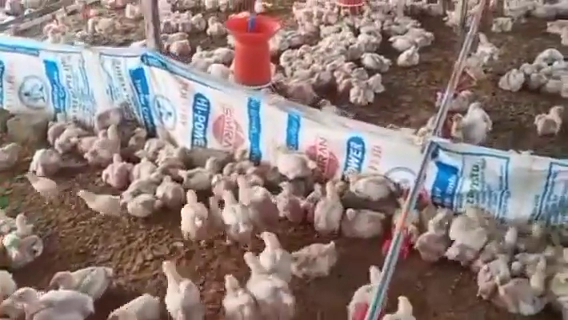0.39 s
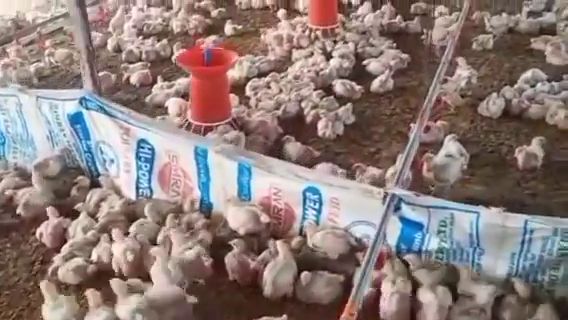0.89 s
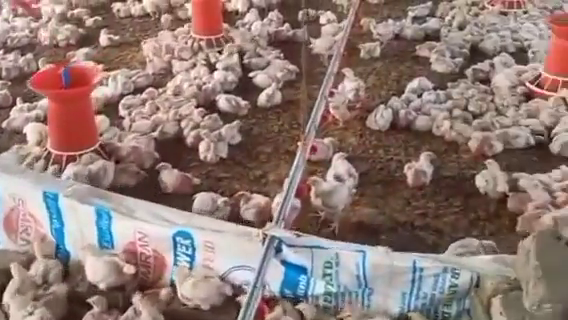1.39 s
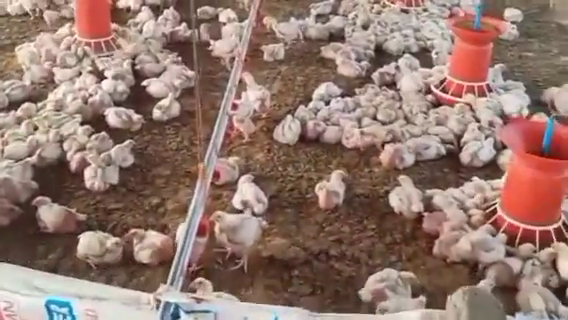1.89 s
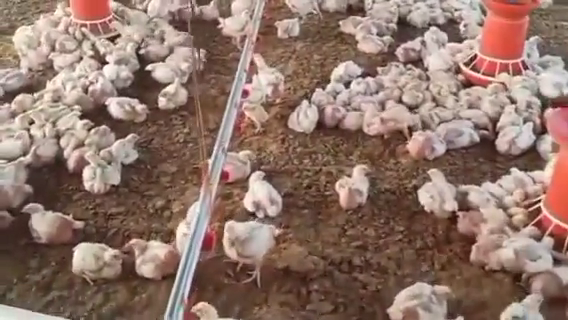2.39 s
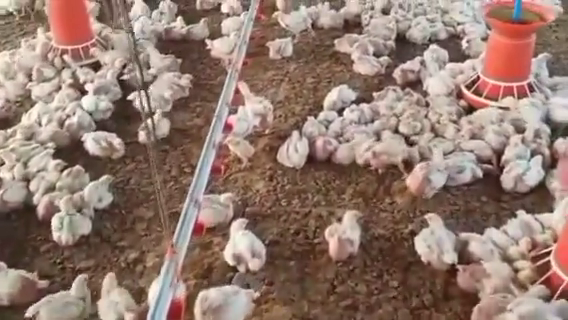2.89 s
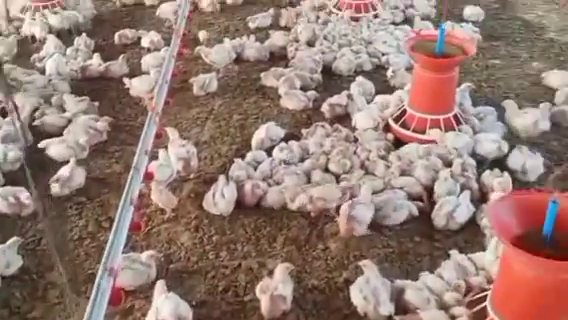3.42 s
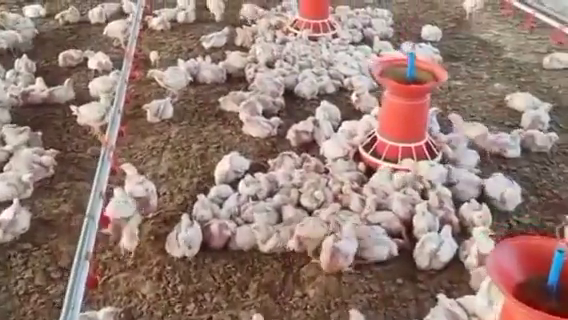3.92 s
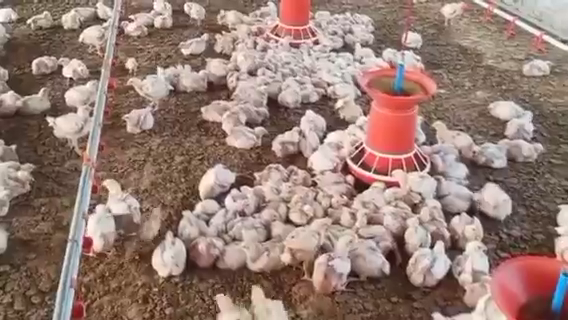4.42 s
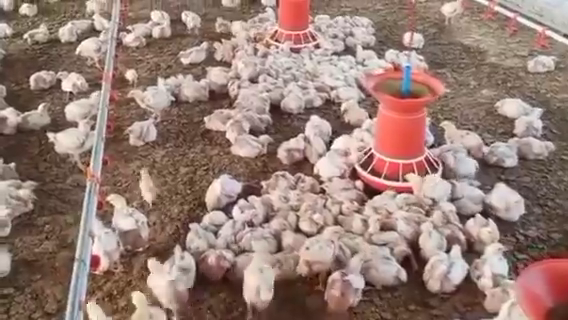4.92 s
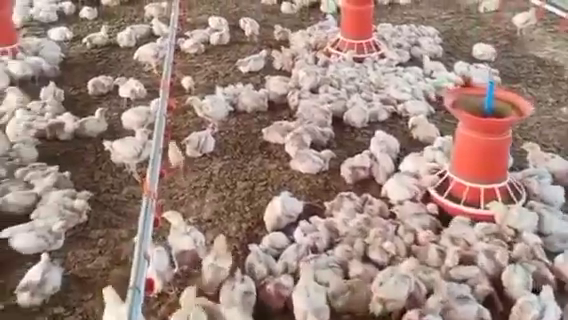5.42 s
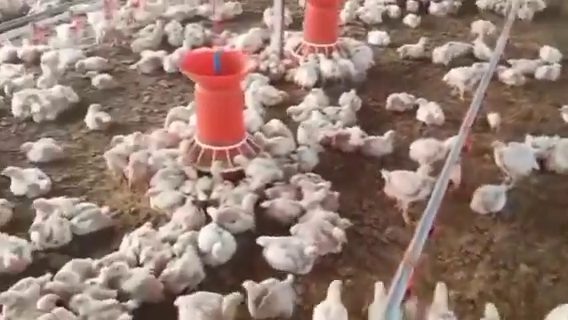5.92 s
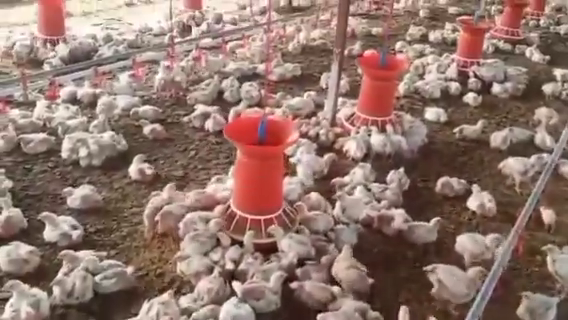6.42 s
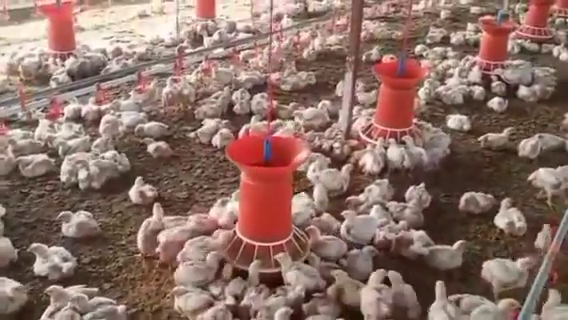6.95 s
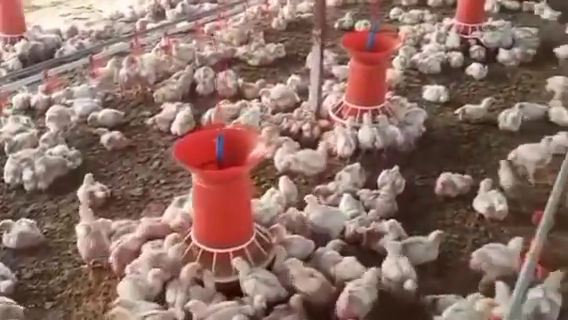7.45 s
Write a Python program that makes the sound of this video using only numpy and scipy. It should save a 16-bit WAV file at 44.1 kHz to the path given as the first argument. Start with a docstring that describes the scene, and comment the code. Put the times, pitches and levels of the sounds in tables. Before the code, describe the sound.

A large flock of young chickens peeps in a dense, constant chorus inside a shed, with rough chirrups, rustling litter and occasional dull knocks.

```python
"""A large flock of chicks peeps in a shed: a dense far chorus goes on throughout, each peep a gliding whistle.
It opens with a low held call and falling peeps; rough chirrups soon join, and both go on to the end.
Dry litter rustles and flicks as filtered noise; dull knocks ring now and then, over a hum with wind lumps.
Late on, one chick close by gives a long throbbing cry, and soon after comes the loudest knock.
Two microphone ports a hand apart hear it all; the right one is duller."""
import sys
import numpy as np
from scipy import signal
from scipy.fft import rfft, irfft, next_fast_len
from scipy.io import wavfile
from scipy.ndimage import uniform_filter1d, minimum_filter1d

SR = 44100
rng = np.random.default_rng(int(sys.argv[2]) if len(sys.argv) > 2 else 0)


def natural_amplitude(level_db):
    """Convert a level in decibels to a linear amplitude factor, elementwise."""
    exponent = np.asarray(level_db, float) / 20
    return 10 ** exponent


def pcm_store(signal):
    """Save signal as 16-bit PCM."""
    levels = np.round(np.clip(np.atleast_2d(signal), -1, 1) * 32767)
    wavfile.write(sys.argv[1], SR, levels.astype(np.int16).T)


N = 333837  # length in samples


def rms_one(x):
    """Scale a sound to an average strength (rms) of 1."""
    return x / np.sqrt(np.mean(x ** 2) + 1e-20)


def in_time(rows):
    """Join the rows of a table by straight lines, one curve for each column after the time."""
    s, *columns = np.transpose(rows)
    return [np.interp(np.arange(N) / SR, s, column) for column in columns]


def colour(x, points):
    """Filter by a table of (Hz, dB), joined by lines on a logarithmic pitch scale."""
    size = next_fast_len(N)
    hz = np.maximum(np.arange(size // 2 + 1) * SR / size, 1)
    points = np.array(points)
    gain_db = np.interp(np.log(hz), np.log(points[:, 0]), points[:, 1])
    return irfft(rfft(x, size) * natural_amplitude(gain_db), size)[..., :N]


def drift(rate):
    """Random wandering of rms 1: noise points at the given rate per second, joined by lines."""
    points = rng.standard_normal(N // 20)
    return rms_one(np.interp(np.arange(N) * rate / SR, np.arange(N // 20), points))


def add(out, s, tone, side):
    """Place a sound; its direction (1 left, -1 right) sets which port hears it first and louder."""
    port_lag_s = 0.00041
    for port, sign in enumerate([1, -1]):
        at = max(round((s - sign * side * port_lag_s / 2) * SR), 0)
        out[port, at:at + len(tone)] += tone[:max(N - at, 0)] * natural_amplitude(5.7 * sign * side)


def whistle(hz, height, overtone_db=-25, third_db=-50):
    """A nearly pure tone with two weak overtones, following a pitch curve and a height curve."""
    phase = 2 * np.pi * np.cumsum(hz) / SR
    overtones = natural_amplitude(overtone_db) * np.sin(2 * phase) + natural_amplitude(third_db) * np.sin(3 * phase)
    return height * (np.sin(phase) + overtones)


def peeps(rows, sides, rough, waver, onset, overtone_db):
    """Each peep glides along a parabola through its three pitches, starts fast and fades; the throat flutters."""
    swell_s = 0.004  # no peep starts faster than this
    out, flutter, wobble = np.zeros((2, N)), drift(240), drift(150)
    for (s, length, start, middle, end, level_db), side, pick in zip(rows, sides, rng.random(len(rows))):
        count = max(round(length * SR), 100)
        u = np.arange(count) / count  # runs from 0 to 1 through the peep
        # each peep takes its shaking from a random place
        first = int(pick * (N - count))
        shake = slice(first, first + count)
        hz = start * (1 - u) * (1 - 2 * u) + 4 * middle * u * (1 - u) + end * u * (2 * u - 1)
        hz = hz * (1 + waver * wobble[shake])
        height = natural_amplitude(level_db) * np.sin(np.pi * u ** onset) ** 0.48
        height *= rms_one(1 + rough * flutter[shake])
        height *= np.sin(np.pi / 2 * np.minimum(u * length / swell_s, 1)) ** 2
        add(out, s, whistle(hz, height, overtone_db), side)
    return out


def shed(x, wet_db):
    """Walls and roof answer with a dying wash, different at each port."""
    t60_s = 0.21  # time for the wash to sink by 60 dB
    t = np.arange(SR // 2) / SR
    wash = rng.standard_normal((2, len(t))) * natural_amplitude(-60 * t / t60_s) * (t > 0.004)
    wash /= np.sqrt(np.sum(wash ** 2, axis=1, keepdims=True))
    return x + natural_amplitude(wet_db) * signal.fftconvolve(x, wash, axes=1)[:, :N]


def patches(x, edges_hz, slow_db, fast_db):
    """Each band between the edges swells and sinks on its own."""
    size = next_fast_len(N)
    tones = rfft(x, size)
    band = np.searchsorted(edges_hz, np.arange(size // 2 + 1) * SR / size)
    out = 0
    for k in range(len(edges_hz) + 1):
        part = irfft(tones * (band == k), size)[:, :N]
        out = out + part * natural_amplitude(slow_db * drift(11) + fast_db * drift(40))
    return out


def chorus():
    """Hundreds of peeps a second from all sides and distances, most of them falling."""
    # How the far flock swells. Each row: time in seconds, level in dB,
    # stir in dB that brings out the lowest and highest voices most.
    flock_level = [(0.0, -26.5, -5.5), (0.9, -27.5, 2), (1.3, -23.5, -13.5), (2.0, -29, 0),
                   (2.68, -28.5, -10), (3.12, -26.5, -0.5), (3.56, -29, 0.5), (4.47, -26, -3),
                   (5.0, -32.5, 7.5), (5.37, -30, -0.5), (5.88, -28.5, 16.5), (6.4, -28, 10),
                   (6.85, -32.5, 17.5), (7.57, -23.5, 12)]
    # Groups of voices. Each row: lowest and highest middle pitch in Hz, peeps per second,
    # usual fall in octaves, level in dB against the chorus, share of the stir.
    voice_groups = [(1396.6, 1950, 80, 0.2076, -12.5, 0.67), (1950, 3000, 170, 0.3594, -1.04, 0.17),
                    (3000, 3900, 44, 0.35, -15.5, 0.33)]
    out, (level_db, stir_db) = 0, in_time(flock_level)
    for low, high, per_s, fall, voice_db, follows in voice_groups:
        # chance decides, every 20 samples, whether a peep starts
        s = np.flatnonzero(rng.random(N // 20) < per_s * 20 / SR) * 20 / SR
        traits = rng.random((N // 20, 6))[(s * SR / 20).round().astype(int)]
        pitch, length, glide, arch, far, side = traits.T
        middle = low * (high / low) ** pitch
        drop = 2 ** (fall * (glide * 1.4 - 0.2))  # pitch ratio of half the glide
        start = middle * drop / (1 + 0.062 * arch)
        distance_db = -5.0 * np.log(far + 0.12)
        rows = np.transpose([s, 0.02 + 0.045 * length ** 2, start, middle, middle / drop, distance_db])
        voices = peeps(rows, 2 * side - 1, rough=0.6, waver=0.02, onset=0.65, overtone_db=-30)
        voices = shed(voices, wet_db=-3)
        out = out + rms_one(voices) * natural_amplitude(level_db + voice_db + follows * stir_db)
    return out


def near_chirrups():
    """Rough calls on a shallow arch that start abruptly; pitch and level shake hard."""
    # Each row: start in seconds, length in seconds, middle pitch in Hz, level in dB before flutter and direction.
    chirrup_calls = [(0.378, 0.045, 1490, -32), (0.51, 0.038, 1582, -24.5), (0.993, 0.039, 2510, -20),
                     (1.044, 0.11, 2813, -24.5), (1.493, 0.056, 2870, -16.5), (1.521, 0.049, 2213, -18),
                     (1.583, 0.014, 2880, -18), (1, 0.034, 2100, -23), (2.281, 0.038, 2215, -19.5),
                     (2.451, 0.024, 2296, -21), (2.571, 0.056, 2680, -16), (2.592, 0.016, 3240, -13),
                     (2.843, 0.062, 1764, -21.5), (2.957, 0.031, 1416, -25.5), (3.006, 0.052, 2730, -17.5),
                     (3.079, 0.074, 1856, -24), (3.182, 0.08, 1950, -24), (3.242, 0.015, 1445, -15),
                     (3.272, 0.079, 2746, -16), (3.283, 0.097, 2040, -23.5), (3.512, 0.06, 2100, -10),
                     (3.829, 0.099, 3580, -30), (3.844, 0.15, 2750, -26.5), (3.94, 0.049, 2774, -21.5),
                     (3.971, 0.039, 1823, -19.5), (4.128, 0.067, 2590, -24), (4.194, 0.053, 2560, -14.5),
                     (4.22, 0.049, 2140, -17), (4.274, 0.092, 2488, -17), (4.28, 0.093, 2144, -26),
                     (4.423, 0.061, 2385, -16.5), (4.448, 0.043, 2850, -23), (4.535, 0.043, 1624, -24),
                     (4.585, 0.031, 1950, -18), (4.586, 0.047, 2515, -16.5), (4.689, 0.097, 3200, -22.5),
                     (5.043, 0.033, 2480, -22.5), (5.139, 0.068, 1506, -29), (5.436, 0.068, 2530, -21),
                     (5.459, 0.099, 1797, -28.5), (5.956, 0.089, 3000, -17), (5.969, 0.017, 2120, -17.5),
                     (6.136, 0.044, 1767, -21.5), (6.432, 0.029, 1233, -26), (6.477, 0.13, 1574, -29),
                     (6.489, 0.13, 3020, -23.5), (6.549, 0.057, 2790, -17), (6.617, 0.048, 1600, -24.5),
                     (6.7, 0.04, 2300, -25.5), (6.812, 0.047, 2630, -24.5), (6.892, 0.039, 1450, -29),
                     (7.127, 0.027, 2260, -27), (7.33, 0.076, 1540, -31), (7.183, 0.048, 2750, -19.5),
                     (7.334, 0.047, 2920, -22), (7.426, 0.072, 1575, -23.5), (7.53, 0.05, 2900, -16.5)]
    rise, sink = 0.98, 0.97  # start and end pitch against the middle
    rows = [(s, length, rise * hz, hz, sink * hz, db) for s, length, hz, db in chirrup_calls]
    sides = rng.uniform(-0.75, 0.1, len(rows))
    return peeps(rows, sides, rough=0.6, waver=0.03, onset=0.45, overtone_db=-22)


def near_falls():
    """Thin, clear peeps that slide down, fastest at first."""
    # Each row: start in seconds, length in seconds, start pitch in Hz, end pitch in Hz,
    # level in dB before flutter and direction.
    falling_peeps = [(0.0, 0.055, 2880, 1675, -27), (0.085, 0.06, 3200, 2360, -28),
                     (0.221, 0.062, 3400, 2150, -26), (0.375, 0.06, 2950, 2050, -25),
                     (0.49, 0.019, 3220, 2670, -22), (0.507, 0.03, 3380, 2660, -27),
                     (0.798, 0.085, 4360, 3000, -34), (1.005, 0.048, 2750, 2310, -25),
                     (1.163, 0.045, 2700, 2130, -20), (1.262, 0.03, 2710, 2050, -29),
                     (1.317, 0.045, 2900, 2090, -28), (1.332, 0.06, 4700, 3400, -34),
                     (2.044, 0.06, 3110, 2345, -24), (2.56, 0.025, 2300, 1850, -24),
                     (3.042, 0.022, 2100, 1540, -23.5), (4.83, 0.063, 3700, 2400, -25),
                     (5.187, 0.037, 3000, 2520, -30), (6.086, 0.036, 3770, 2580, -33),
                     (6.32, 0.065, 3950, 2414, -17), (6.408, 0.023, 2140, 1525, -21),
                     (6.575, 0.026, 2275, 1820, -21.5), (6.597, 0.024, 2190, 1590, -20.5),
                     (6.755, 0.045, 4250, 3200, -30), (6.88, 0.026, 3390, 2540, -28),
                     (6.943, 0.04, 3480, 2525, -28), (7.085, 0.078, 3320, 2180, -28),
                     (7.255, 0.045, 3750, 2650, -25)]
    sag = 0.93  # pitch halfway, against the mean of start and end
    rows = [(s, length, start, sag * (start + end) / 2, end, db) for s, length, start, end, db in falling_peeps]
    sides = rng.uniform(-0.1, 0.1, len(rows))
    return peeps(rows, sides, rough=0.35, waver=0.013, onset=0.9, overtone_db=-34)


def cry():
    """One chick close by cries up and far down, throbbing, hoarse then clear; a rough copy sounds high above."""
    # Path of the cry. Each row: time in seconds, pitch in Hz, level in dB before throb and direction,
    # hoarseness as a share of the pitch.
    cry_path = [(5.7, 4000, -51, 0.072), (5.725, 3910, -27, 0.028), (5.76, 3860, -28, 0.021),
                (5.798, 4220, -19.5, 0.023), (5.831, 4090, -16, .014), (5.859, 3967, -13, 0.012),
                (5.891, 3727, -20.5, 0.0194), (5.911, 3490, -16.5, 0.011), (5.933, 2840, -17, 0.012),
                (5.953, 2320, -32, 0.0088), (5.97, 2180, -40, 0.0073)]
    throbs_per_s = 61  # on average; the rate wanders
    copy_shift_hz, copy_db = 7640, -18  # a rough copy of the cry is heard, shifted up this far and this faint
    out = np.zeros((2, N))
    hz, level_db, hoarse = in_time(cry_path)
    start_s, end_s = cry_path[0][0], cry_path[-1][0]
    on = slice(round(start_s * SR), round(end_s * SR))
    throb = np.sin(2 * np.pi * np.cumsum(throbs_per_s * (1 + 0.3 * drift(40))) / SR)
    height = natural_amplitude(level_db) * (1 + 0.55 * throb + 0.25 * drift(200))
    hoarse_hz = hz * (1 + hoarse * drift(500))
    add(out, start_s, whistle(hoarse_hz[on], height[on], overtone_db=-24), side=-0.65)
    copy_hz = hz + copy_shift_hz + 170 * drift(900)
    shifted_copy = natural_amplitude(copy_db) * height * np.sin(2 * np.pi * np.cumsum(copy_hz) / SR)
    add(out, start_s, shifted_copy[on], side=0.4)
    return out


def low_call():
    """A held, gently sagging call with four partials, the second one strongest."""
    # One row: start in seconds, length in seconds, start pitch in Hz, end pitch in Hz,
    # level in dB that the partials are set against.
    held_call = (0.01, 0.25, 1290, 1230, -40)
    out, (s, length, start, end, level_db) = np.zeros((2, N)), held_call
    u = np.arange(round(length * SR)) / (length * SR)
    hz = (start + (end - start) * u) * (1 + 0.024 * drift(149)[:len(u)])
    phase = 2 * np.pi * np.cumsum(hz) / SR
    tone = sum(natural_amplitude(db) * np.sin((k + 1) * phase) for k, db in enumerate([-3.5, 7, -5, -6]))
    add(out, s, natural_amplitude(level_db) * np.sin(np.pi * u) ** 0.15 * tone, side=-0.18)
    return out


def litter():
    """Feet stir dense tiny grains, clumped band by band; a flick is a short spray of louder grains."""
    # Rustle of the litter. Each row: time in seconds, level in dB before random drift.
    rustle_level = [(0.0, -37), (0.4, -39), (1.33, -42), (1.41, -33.5), (1.56, -37.5), (3.3, -35),
                    (3.5, -36.5), (5.65, -36), (5.88, -34.5), (6.3, -35.5), (6.79, -38.5), (7.02, -34.5),
                    (7.17, -41), (7.57, -36.5)]
    # Litter flicked. Each row: start in seconds, level of the spray in dB.
    flick_times = [(0.6784, -43), (1.013, -30.5), (1.29, -36.5), (1.4082, -44), (1.467, -34), (2.809, -33),
                   (3.009, -33.5), (3.2165, -30.5), (3.334, -31), (3.6775, -41), (4.5033, -27),
                   (5.029, -28), (6.987, -36)]
    # Colour of the rustle as heard in the end, with a gap near 8.4 kHz.
    # Each row: frequency in Hz, relative level in dB per Hz.
    heard_colour = [(1300, -13.5), (2500, 13.5), (5000, 5.5), (7700, 9.5), (8050, -19.5), (8750, -14.5),
                    (9100, 3), (13500, 4.5), (15200, 3.5), (15700, -19)]
    # Frequencies in Hz that part the bands of the rustle.
    rustle_edges_hz = [3600, 4500, 5500, 6800, 10200, 12500]
    t = np.arange(SR // 20) / SR
    flicks = np.zeros(N)
    for s, level_db in flick_times:
        flicks[round(s * SR)] = natural_amplitude(level_db)
    spray_shape = np.minimum(t / 0.00057, 1) * np.exp(-t / 0.024)
    spray = signal.fftconvolve(flicks, spray_shape)[:N]
    level = natural_amplitude(in_time(rustle_level)[0] + 1.2 * drift(14) + 1.5 * drift(50)) + spray
    # random loudness from sample to sample makes the noise grainy
    noise = rng.standard_normal((2, N)) * natural_amplitude(1.0 * rng.exponential(1, (2, N)))
    grains = colour(noise, heard_colour)
    return patches(grains, rustle_edges_hz, slow_db=2.0, fast_db=1.1) / np.std(grains[0]) * level


def knocks():
    """Dull bumps against feeders: a puff of noise ringing briefly round one pitch."""
    # Each row: start in seconds, peak in dB before direction, pitch in Hz.
    bumps = [(0.763, -36, 790), (2.549, -38.5, 286), (3.18, -43, 437), (3.298, -42, 400),
             (4.37, -36.5, 790), (4.585, -41, 880), (4.641, -42.5, 410), (6.243, -40.5, 700),
             (6.845, -22.5, 830), (7.067, -45, 317)]
    fade_cycles = 12  # the puff of noise fades to about a third over this many cycles
    out, t = np.zeros((2, N)), np.arange(SR // 8) / SR
    for (s, peak_db, hz), noise in zip(bumps, rng.standard_normal((len(bumps), len(t)))):
        band = signal.butter(1, [hz / 1.07, hz * 1.08], "band", fs=SR)
        puff = signal.lfilter(*band, noise * np.exp(-t * hz / fade_cycles))
        add(out, s, natural_amplitude(peak_db) * puff / np.abs(puff).max(), side=-0.75)
    return out


def hum():
    """The air of the shed, much alike at both ports, with lumps of wind in the bass."""
    # Colour of the hum. Each row: frequency in Hz, relative level in dB per Hz.
    air_colour = [(25, -23), (55, -8.5), (120, -4), (270, -1), (600, -2.5), (850, -8), (1000, -8.5),
                  (2000, -47)]
    # The hum swells and sinks. Each row: time in seconds, level in dB before the patches.
    air_level = [(0.0, -61), (0.55, -57.5), (0.8, -61), (2.32, -62.5), (2.59, -55), (3.01, -62),
                 (3.39, -56.5), (3.65, -64.5), (6.85, -62), (7.57, -65)]
    # Wind on the ports. Each row: middle in seconds, level in dB before the share of each port.
    wind_gusts = [(1.4, -61), (2.1, -59), (3.919, -65), (6.4, -66)]
    # Frequencies in Hz that part the bands of the hum.
    air_edges_hz = [180, 330, 520, 720]
    gust_s = 0.082  # from the middle of a gust until it has sunk to about a third
    shared, left, right, wind = rng.standard_normal((4, N))
    air = np.array([0.54 * shared + 0.065 * left, shared + 0.36 * right])
    air = rms_one(colour(air, air_colour))
    t = np.arange(N) / SR
    blow = sum(natural_amplitude(db) * np.exp(-((t - s) / gust_s) ** 2) for s, db in wind_gusts)
    bass = rms_one(colour(wind, [(25, -29), (60, 1), (110, -7), (400, -72)]))
    lumps = bass * (blow + natural_amplitude(-82)) * [[0.5], [1.5]]  # stronger at the right port
    return patches(air, air_edges_hz, slow_db=3.5, fast_db=3.0) * natural_amplitude(in_time(air_level)[0]) + lumps


def dropouts(x):
    """Narrow stretches, about 150 Hz by 80 ms, sink away here and there in two bands."""
    # Frequencies in Hz: dropouts come between the first two and above the last.
    faint_bands_hz = [850, 1350, 3400]
    depth_db, threshold = 47, 0.62  # cut for each spread of chance beyond the threshold
    cells = signal.stft(x, nperseg=1024)[2]
    # smoothed along frequency (axis 0) and time (axis 1), so that chance comes in blots
    chance = rng.standard_normal(cells.shape[1:])
    for axis, size in [(0, 3), (0, 2), (1, 6), (1, 4)]:
        chance = uniform_filter1d(chance, size=size, axis=axis)
    hz = np.arange(len(chance))[:, None] * SR / 1024
    faint = np.searchsorted(faint_bands_hz, hz) % 2
    cut_db = depth_db * faint * np.maximum(rms_one(chance) - threshold, 0)
    return signal.istft(cells * natural_amplitude(-cut_db), nperseg=1024)[1][:, :N]


def suppressor(x):
    """Faint sound up to about 1 kHz above or 400 Hz below a much louder one is muted."""
    margin_db, steepness = 25.5, 7.2  # how far under the loud sound muting starts; dB cut for each dB beyond
    cells = signal.stft(x, nperseg=1024)[2]
    power = uniform_filter1d(np.abs(cells) ** 2, size=3, axis=1)
    power = uniform_filter1d(power, size=5, axis=2)
    level_db = 10 * np.log10(np.maximum(power, 1e-20))
    loudest_db = -minimum_filter1d(-level_db, size=35, axis=1, origin=8)
    cut_db = steepness * np.maximum(loudest_db - margin_db - level_db, 0)
    return signal.istft(cells * natural_amplitude(-cut_db), nperseg=1024)[1][:, :N]


def scene():
    """Near sounds ring in the shed; the far chorus, litter and hum have dropouts."""
    near = near_falls() + near_chirrups() + cry() + low_call() + knocks()
    far = chorus() + litter() + hum()
    return shed(near, wet_db=-4) + dropouts(far)


def top_cut(x):
    """Nothing passes above the cut-off."""
    return signal.sosfilt(signal.butter(12, 15730, fs=SR, output="sos"), x)


def record(dry):
    """The right port loses treble, then faint sound close in pitch to loud sound is muted."""
    # The right port. Each row: frequency in Hz, level in dB added to its sound.
    right_port = [(60, 0.5), (140, -7), (300, -3), (600, -3), (1200, 1.5), (2700, -9.5), (6400, -4.5),
                  (9800, -10.5), (12500, -27), (15000, -23)]
    ports = np.array([dry[0], colour(dry[1], right_port)])
    mix = suppressor(ports)
    return top_cut(mix)


dry = scene()
out = record(dry)
pcm_store(out)
```